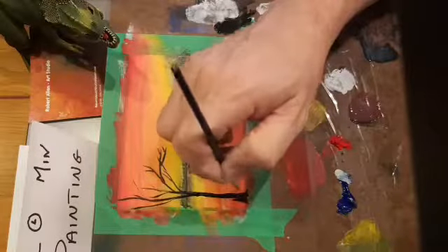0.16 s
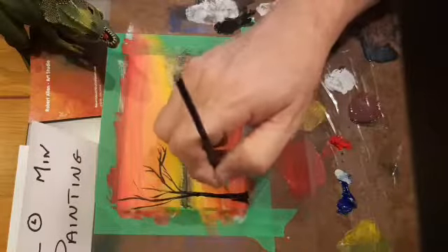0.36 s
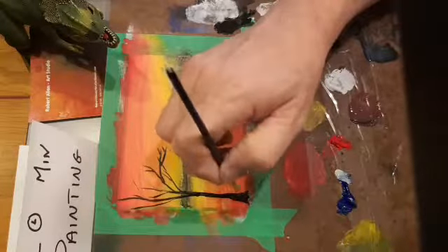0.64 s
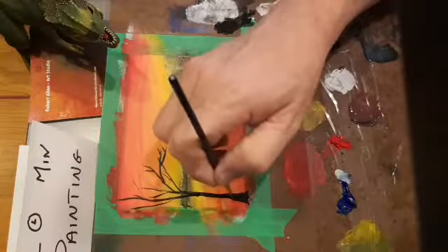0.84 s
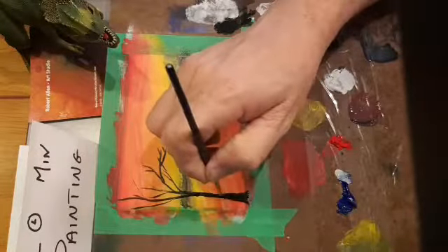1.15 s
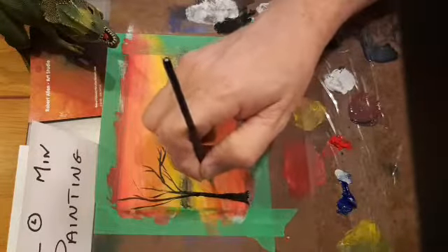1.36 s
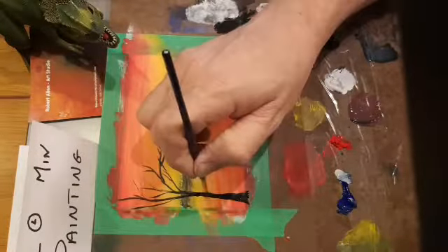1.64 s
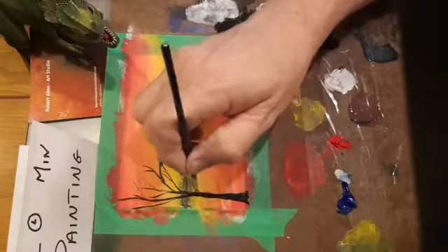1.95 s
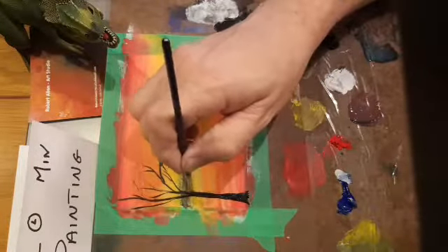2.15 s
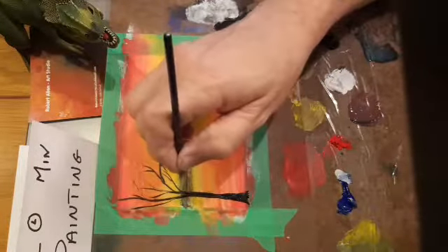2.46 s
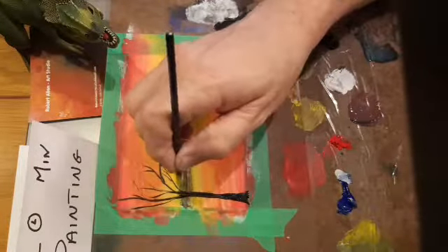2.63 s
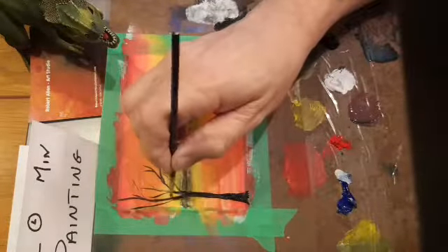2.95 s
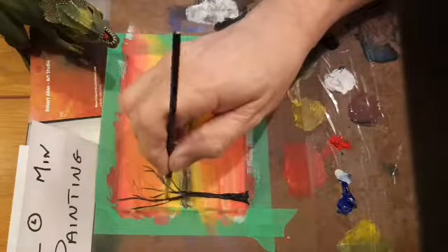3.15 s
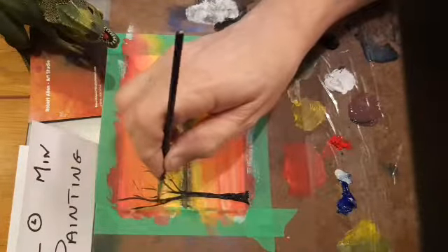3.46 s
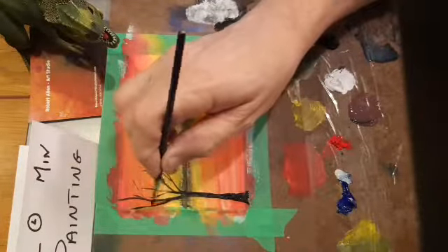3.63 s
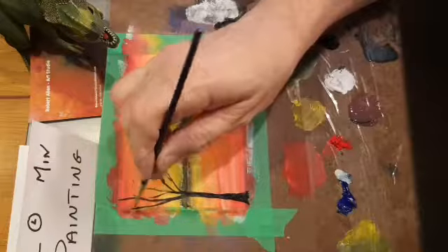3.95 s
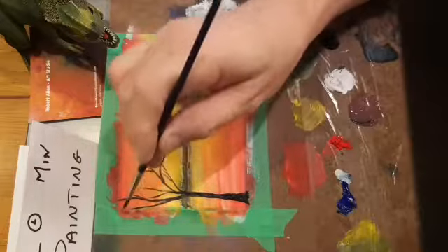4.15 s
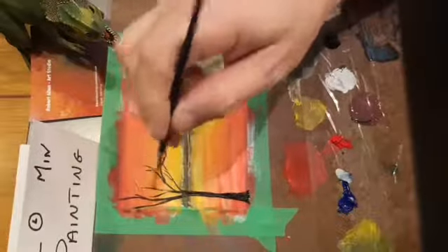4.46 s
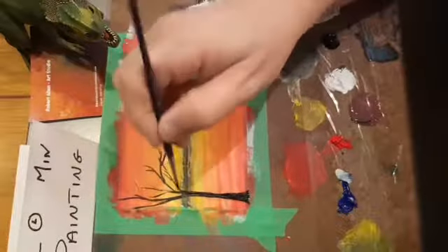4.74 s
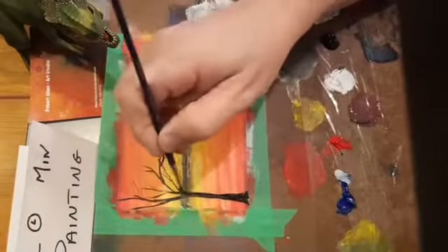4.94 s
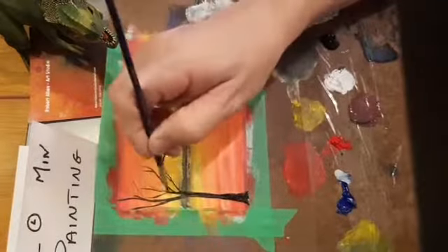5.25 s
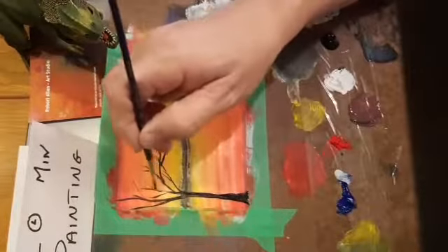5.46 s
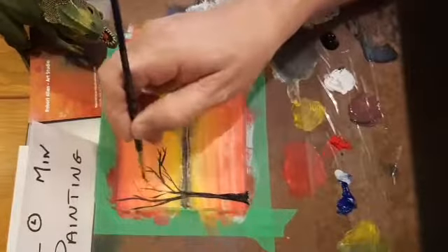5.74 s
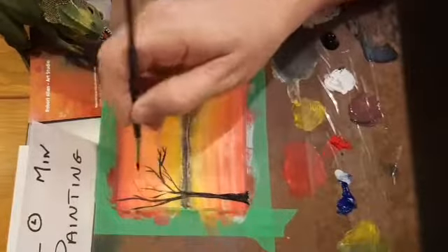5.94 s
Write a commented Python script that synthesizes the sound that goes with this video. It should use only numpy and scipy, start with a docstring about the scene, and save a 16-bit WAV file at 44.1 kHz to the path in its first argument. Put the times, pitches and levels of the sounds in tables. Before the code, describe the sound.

In a quiet studio, a phone microphone picks up a low steady hum, slight hiss and the quick, faint metallic ticking of a mechanical timer. A duller wall clock ticks once a second in the distance. Past the middle comes a light wooden knock on the table, followed by a soft rustle of cloth. A brighter sleeve slide and another light knock come at the very end, with the ticking continuing throughout.

```python
"""From the start a wind-up timer ticks on a studio table, its escapement ringing the case about four
times a second, while a wall clock steps once a second further off. Under them sit a low rumble in the
table's resonances and the hiss of a phone microphone. At 4.2 s something knocks the table lightly,
then a sleeve brushes it. At 5.9 s the sleeve starts a firmer slide, and a second knock lands at 6 s."""
import sys
import numpy as np
from scipy import signal
from scipy.fft import rfft, irfft, next_fast_len
from scipy.io import wavfile
from scipy.ndimage import uniform_filter1d, map_coordinates

SR = 44100
rng = np.random.default_rng(int(sys.argv[2]) if len(sys.argv) > 2 else 0)


def file_out(sig):
    """Save sig as 16-bit WAV at sys.argv[1]."""
    # one column per channel
    cols = np.atleast_2d(sig).T
    # limit, then scale
    lim = np.clip(cols, -1, 1)
    pcm = np.round(lim * 32767).astype(np.int16)
    wavfile.write(sys.argv[1], SR, pcm)


N = 269002


def timer():
    """Each escapement contact rings the case and gives a steel click; returns (body, steel) layers."""
    case_modes = [(1210, -19.5, 0.15), (2162, -3, 0.024), (2320, -0.5, 0.031), (2425, 0.5, 0.026),
                  (2654, -13.5, 0.028), (3280, -8, 0.018)]  # modes of the case: f/Hz, level/dB, t60/s
    steel_spectrum = [(2060, -2), (3500, -5), (3980, -11), (6110, -9.5), (6860, -15), (7700, -7),
                      (11600, -6), (12800, -4), (14000, -10)]  # colour of the click: f/Hz, density/dB
    steel_peaks = [(3233, 300, 1.5), (7610, 72, 1.5), (9470, 120, 1.5), (10800, 110, -11), (12900, 150, -7),
                   (13100, 130, 3)]  # resonances of the steel: f/Hz, width/Hz, lift/dB
    spread_db, detune = 3, 0.013  # each contact finds the modes at new strengths, slightly shifted
    t, case, contacts = np.arange(SR // 12) / SR, np.zeros(N + SR), escapement()
    scatters = rng.standard_normal((len(contacts), len(case_modes), 2)) * [spread_db, detune]
    attack = (1 - np.exp(-t / 0.0014)) ** 2
    for (start, ring_db, _, _), scatter in zip(contacts, scatters):
        ring = sum(damped_sine(t, hz * (1 + shift), db + extra_db, t60)
                   for (hz, db, t60), (extra_db, shift) in zip(case_modes, scatter))
        place(case, start, amp(ring_db + 2.5) * ring * attack)
    clicks = bursts([(start, db, t60) for start, _, db, t60 in contacts], attack_s=0.00023)
    base_jolt = filtered(clicks, resonances([(920, 116, -0.73), (1710, 590, -0.36)]))
    steel = filtered(clicks, lifted(steel_spectrum, steel_peaks))
    return case[:N] + amp(14.5) * base_jolt, amp(10.5) * steel


def escapement():
    """Release, push, lock, drop and rebound of every beat, as (t/s, ring/dB, click/dB, click t60/s)."""
    # beats, tick and tock in turn: lock t/s, steel click/dB, case ring/dB, release ring/dB
    beats = [(0.179, -59, -49, -57), (0.409, -61.5, -46, -52.5), (0.643, -59, -52.5, -53),
             (0.872, -61, -50.5, -53.5), (1.105, -56.5, -52, -53.5), (1.337, -61.5, -48, -54.5),
             (1.570, -59, -48, -59.5), (1.798, -60, -47.5, -57), (2.033, -58, -49.5, -51.5),
             (2.263, -61.5, -46.5, -54.5), (2.497, -56.5, -48, -59), (2.726, -61, -51.5, -52),
             (2.959, -57.5, -48, -54.5), (3.192, -61, -51, -51.5), (3.422, -59, -50, -57),
             (3.654, -61, -50.5, -56), (3.882, -57, -50, -59), (4.115, -60.5, -51, -53),
             (4.3456, -56.5, -48.5, -61), (4.576, -61.5, -53, -58), (4.808, -57, -55, -59),
             (5.040, -60.5, -56.5, -53.5), (5.271, -56, -54, -61), (5.503, -59.5, -53, -54),
             (5.734, -55.5, -48, -62), (5.968, -59.5, -53, -70)]
    # release of a tick and of a tock: lead on the lock/s, click against its ring/dB, click t60/s
    releases = [(.031, -17.5, 0.033), (.028, -14, .06)]
    # push, lock, drop and rebound, relative to their beat: t/s, ring/dB, click/dB, click t60/s
    tick = [(-.014, -6.5, -15, .03), (0, -0.9, 1.5, 0.018), (.007, -11.5, -11, 0.059),
            (.054, -15, -19, .03)]
    tock = [(-.008, -10, -20, 0.035), (0, -6.5, 2, 0.039), (.012, 0, -11, 0.055), (.019, -7, -14, .05)]
    play_s, play_db = 0.002037, 1
    contacts, play = [], rng.standard_normal((len(beats), len(tick), 2))
    for k, (lock, click_db, ring_db, release_db) in enumerate(beats):
        lead, under_db, t60 = releases[k % 2]
        contacts.append((lock - lead, release_db, release_db + under_db, t60))
        for (offset, ring, click, t60), (late, harder) in zip((tick, tock)[k % 2], play[k]):
            loose = abs(offset) > .003  # the lock itself has no play; the other contacts shift in time and strength
            start = lock + offset + loose * play_s * late
            contacts.append((start, ring_db + ring + loose * play_db * harder, click_db + click, t60))
    return contacts


def wall_clock():
    """The second hand steps with a short rattle of gears; then the wheel lands with a woody tock."""
    steps = [(0.108, -68, -60), (1.093, -61.5, -74), (2.098, -70, -56.5), (3.094, -65.5, -57),
             (4.097, -65, -64), (5.099, -71, -66)]  # steps of the hand: t/s, rattle/dB, tock/dB
    body_modes = [(920, 93, -0.5), (1480, 200, -8), (2240, 360, -6), (3420, 650, -12), (4530, 3900, -16.5)]  # resonances that colour the rattle: f/Hz, width/Hz, level/dB
    frame_modes = [(900, -10.5), (965, 2.5), (1050, -18), (1560, -4)]  # modes of the clock's frame: f/Hz, level/dB
    gears = bursts([(start, db, .14) for start, db, _ in steps], attack_s=0.0038)
    rattle = filtered(gears, resonances(body_modes))
    t, tocks = np.arange(SR // 8) / SR, np.zeros(N)
    envelope = amp(-60 * t / 0.053) * (1 - np.exp(-t / 0.0037))
    for start, _, db in steps:
        ring = sum(amp(level + rng.normal(0, 2.9)) * np.sin(2 * np.pi * (hz * t + rng.random()))
                   for hz, level in frame_modes)
        place(tocks, start + .009, amp(db + 3.5) * envelope * ring)
    return filtered(amp(29.5) * rattle + tocks, lambda hz: 1 / (1 + (hz / 5000) ** 4))  # dull with distance


def table_knocks():
    """A small tap, then a soft blow and one rebound that ring the table; a far wall returns the bass."""
    knocks = [(4.242, -29, -33.5), (6.0112, -28.5, -32)]  # hits on the table: t/s, blow/dB, tap/dB
    board_modes = [(127, -7, 1), (162, -7, -1), (207, -5, 1), (251, -5, 1), (328, 0, 1), (402, -8, 1),
                   (487, -2, 1), (521, 0, -1), (598, -10, -1), (651, -13, -1), (735, -4, -1), (911, -19, 1)]  # modes of the board: f/Hz, level/dB, side that moves first (+1 or -1)
    tap_modes = [(78.7, -0.5, 0.11), (800, -10.5, 0.033), (1043, 0, 0.025), (1500, -16, 0.045),
                 (2050, -13, 0.031)]  # ring of the tap: f/Hz, level/dB, t60/s
    tap_lead_s, rebound_s, echo_s = .0022, .0116, .0385
    t, hits = np.arange(SR // 2) / SR, np.zeros(N + SR)
    ring = sum(side * damped_sine(t, hz, db, t60=.118 * (300 / hz) ** .95)  # high modes die sooner
               for hz, db, side in board_modes)
    ring *= 1 - np.exp(-t / .0005)
    tap = -sum(damped_sine(t, *mode) for mode in tap_modes) * (1 - np.exp(-t / 0.0019))
    for start, blow_db, tap_db in knocks:
        place(hits, start - tap_lead_s, amp(tap_db) * tap)
        place(hits, start, amp(blow_db) * ring)
        place(hits, start + rebound_s, amp(blow_db - 13) * ring)
    crack = bursts([(start - tap_lead_s, db, .04) for start, _, db in knocks], attack_s=0.00052)
    crack = filtered(crack, lambda hz: 1 / (1 + 1j * hz / 3000) ** 4)
    wall_echo = lambda hz: 1 + amp(-25) * np.exp(-2j * np.pi * hz * echo_s) / (1 + 1j * hz / 350) ** 2
    return filtered(hits[:N] + amp(-3.5) * crack, wall_echo)


def sleeve():
    """Cloth sliding on the table: fibres catch in tiny slips; a firm slide is brighter than a brush."""
    spectrum = [(500, -18), (1200, 4.5), (2000, 0.5), (2800, -3), (5000, -10.5), (8500, -14),
                (14000, -16.5)]  # colour of the friction: f/Hz, density/dB
    slides = [(4.5, 0.23, 0.17, .15, -69.5, -3), (5.897, 0.021, .005, .03, -68, -12),
              (5.953, 0.093, .1, .1, -58.5, 5.5)]  # strokes of the sleeve: t/s, swell/s, hold/s, fade/s, level/dB, treble/dB
    ramp_db = 16  # rise over the swell time, fall over the fade time
    slips = amp(1.7 * unit(uniform_filter1d(rng.standard_normal(N), size=SR // 400)))
    cloth = unit(filtered(slips * rng.standard_normal(N), lambda hz: amp(along(spectrum, hz))))
    dull = filtered(cloth, lambda hz: 1 / (1 + (hz / 5500) ** 4))
    t, out = np.arange(N) / SR, np.zeros(N)
    for start, swell, hold, fade, db, treble_db in slides:
        before_peak = 1 - (t - start) / swell
        after_hold = (t - start - swell - hold) / fade
        envelope = amp(db - ramp_db * np.maximum(0, np.maximum(before_peak, after_hold)))
        out += envelope * (dull + amp(treble_db) * (cloth - dull))
    return out


def room(x):
    """A short studio reverb whose treble dies first; every third of a second gets a new noise tail."""
    decay = [(200, 0.23), (1000, 0.21), (3000, 0.13), (12000, 0.058)]  # reverb time of the studio: f/Hz, t60/s
    out, block, predelay = np.zeros(N + SR), SR // 3, 200  # lengths in samples
    for i in range(0, N, block):
        hz, t, noise = signal.stft(rng.standard_normal(SR // 2), SR, nperseg=256)
        t60 = along(decay, hz)[:, None]
        tail = signal.istft(noise * amp(-60 * t / t60), SR, nperseg=256)[1][:SR // 2]
        wet = signal.fftconvolve(x[i:i + block], tail / np.linalg.norm(tail))
        out[i + predelay:][:len(wet)] += wet
    return out[:N]


def table_rumble():
    """A low, heavy bed of noise, lifted at the table's resonances; its level wavers a little."""
    spectrum = [(15, -23.5), (40, -22.5), (75, -11.5), (120, -12), (135, -10.5), (170, -3), (250, -13.5),
                (346, -19), (390, -27), (494, -22.5), (668, -27.5), (1000, -32.5), (2490, -38),
                (6000, -52.5)]  # colour of the rumble: f/Hz, density/dB
    peaks = [(169.6, 18.2, 0.5), (340.5, 97, -4.5), (492, 34, 1.5), (630, 6.9, 8), (728, 13, -10),
             (1208, 3, 3.5)]  # resonances of the table: f/Hz, width/Hz, lift/dB
    level_db, waver_db = -51.5, 0.31
    waver = map_coordinates(rng.standard_normal(3 * N // SR + 4), [np.arange(N) * 3 / SR])
    bed = unit(filtered(rng.standard_normal(N), lifted(spectrum, peaks)))
    return amp(level_db + waver_db * waver) * bed


def microphone_hiss():
    """The microphone's own steady noise."""
    spectrum = [(2000, -19), (5000, 2), (8000, -9.5), (10500, -6), (12500, 4), (14000, 5.5)]  # colour of the hiss: f/Hz, density/dB
    return amp(-77) * unit(filtered(rng.standard_normal(N), lambda hz: amp(along(spectrum, hz))))


def amp(db):
    """Gain of a level in dB."""
    return 10 ** (np.asarray(db) / 20)


def unit(x):
    """x at rms 1."""
    return x / np.sqrt(np.mean(x ** 2) + 1e-20)


def place(track, start, sound):
    """Mix a sound into a track at start/s."""
    track[round(start * SR):][:len(sound)] += sound


def damped_sine(t, hz, db, t60):
    """One ringing mode, falling 60 dB in t60/s."""
    return amp(db - 60 * t / t60) * np.sin(2 * np.pi * hz * t)


def bursts(events, attack_s):
    """Noise that starts at each (t/s, level/dB, t60/s) and dies away."""
    t, envelope = np.arange(SR // 6) / SR, np.zeros(N + SR)
    for start, db, t60 in events:
        place(envelope, start, amp(db - 60 * t / t60) * (1 - np.exp(-t / attack_s)))
    return envelope[:N] * rng.standard_normal(N)


def along(points, hz):
    """Curve through (f/Hz, value) points on a log frequency axis."""
    f, values = np.transpose(points)
    return np.interp(np.log(hz + 1), np.log(f + 1), values)


def filtered(x, response):
    """x through a complex frequency response."""
    size = next_fast_len(N + SR // 2)
    return irfft(rfft(x, size) * response(np.fft.rfftfreq(size, 1 / SR)), size)[..., :N]


def resonances(modes):
    """Causal response of (f/Hz, width/Hz, level/dB) modes of alternating polarity."""
    return lambda hz: sum((-1) ** k * amp(db) * 1j * hz * width / (f * f - hz * hz + 1j * hz * width)
                          for k, (f, width, db) in enumerate(modes))


def lifted(spectrum, peaks):
    """EQ curve of a spectrum raised at a few (f/Hz, width/Hz, lift/dB) peaks."""
    lift = lambda hz: sum(amp(db) / (1 + (2 * (hz - f) / width) ** 2) for f, width, db in peaks)
    return lambda hz: amp(along(spectrum, hz)) * (1 + lift(hz))


def scene():
    """Mono mix: ticks and knocks with their reverb, the dry sleeve, and a bed of rumble and hiss."""
    (body, steel), clock, knocks = timer(), wall_clock(), table_knocks()
    reverb = room(amp(-12) * body + amp(-4) * steel + amp(-6.5) * clock + amp(-13.5) * knocks)
    return (body + steel + clock + knocks + reverb + table_rumble() + sleeve() + microphone_hiss())[None]


def record(dry):
    """The phone's treble drops by a step near the top and ends at its band limit."""
    step_hz, limit_hz = 13950, 15100
    return filtered(dry, lambda hz: np.where(hz < step_hz, 1, amp(-27)) * (hz < limit_hz))


dry = scene()
out = record(dry)
file_out(out)
```